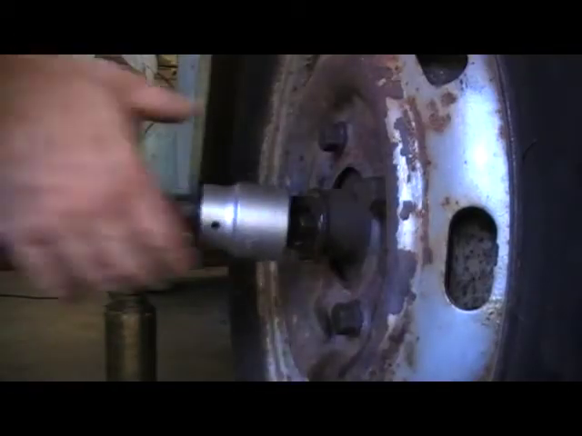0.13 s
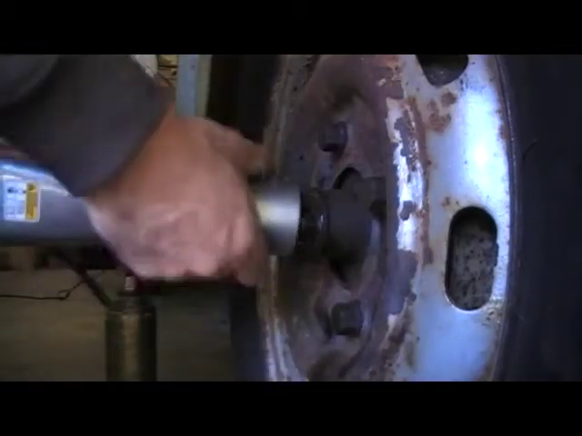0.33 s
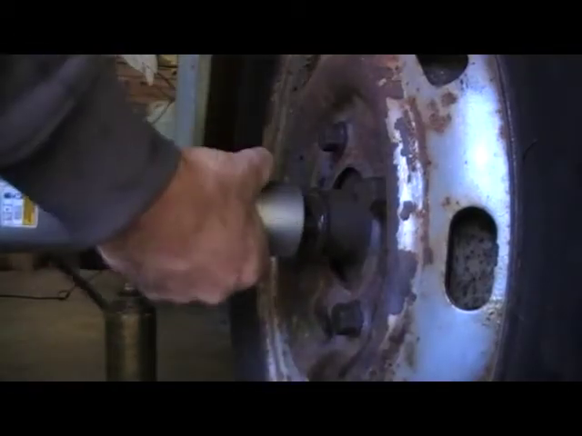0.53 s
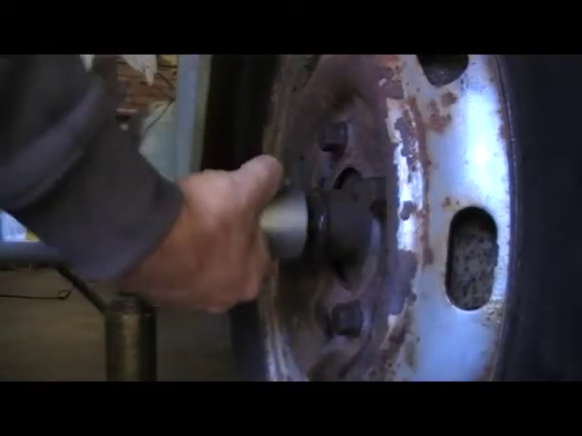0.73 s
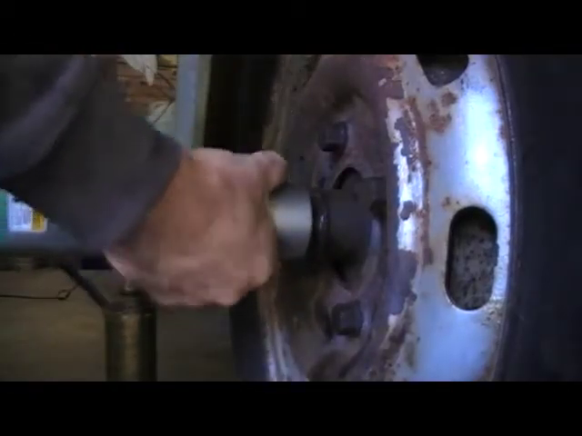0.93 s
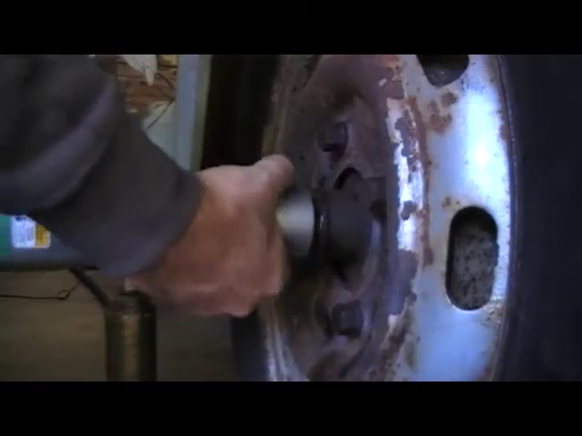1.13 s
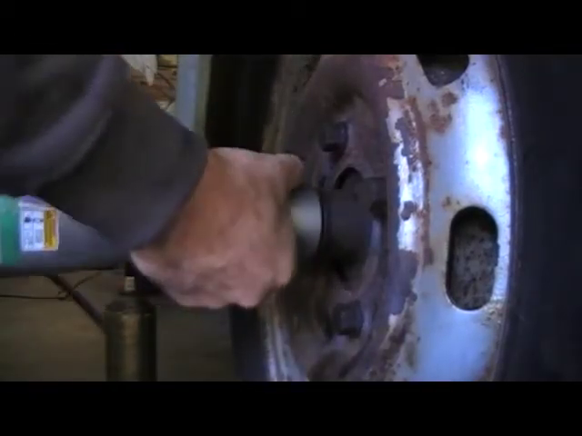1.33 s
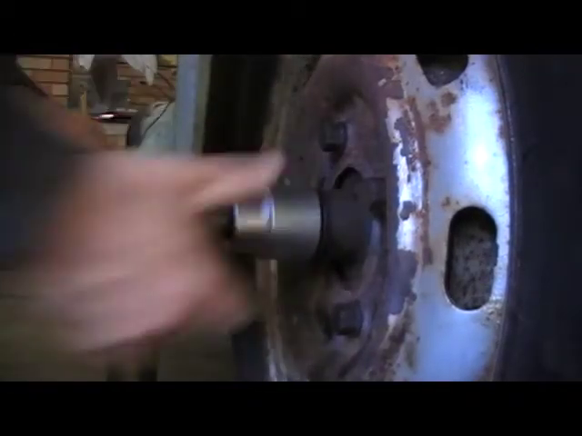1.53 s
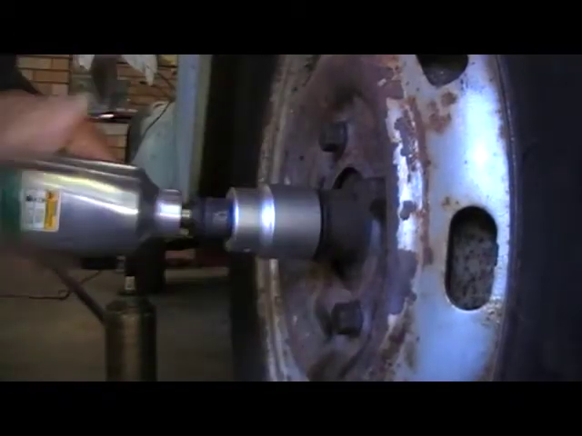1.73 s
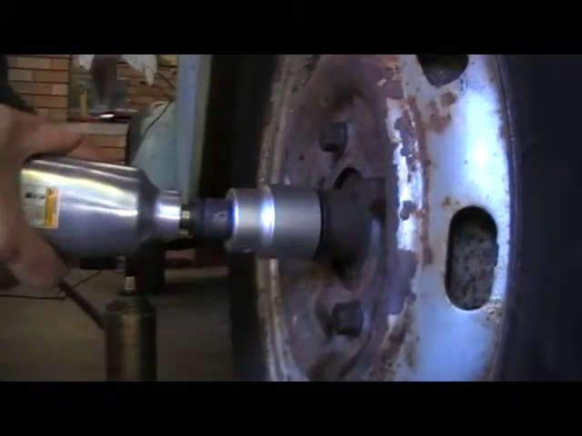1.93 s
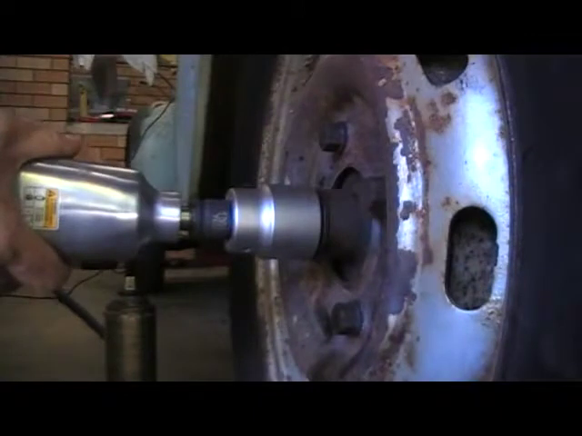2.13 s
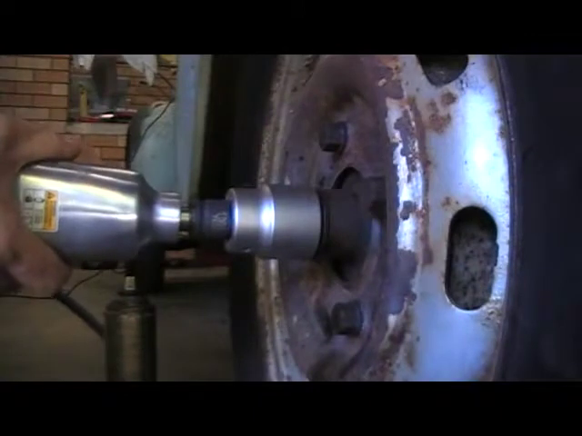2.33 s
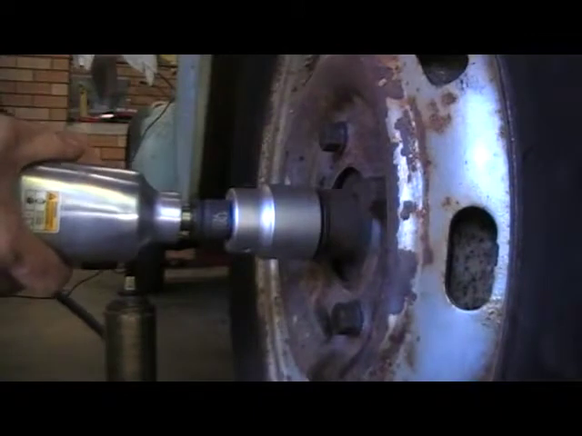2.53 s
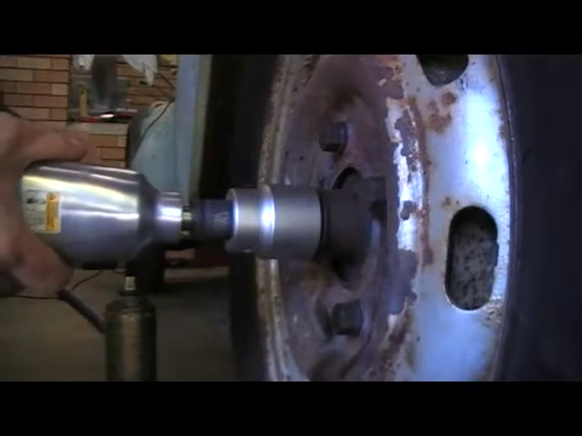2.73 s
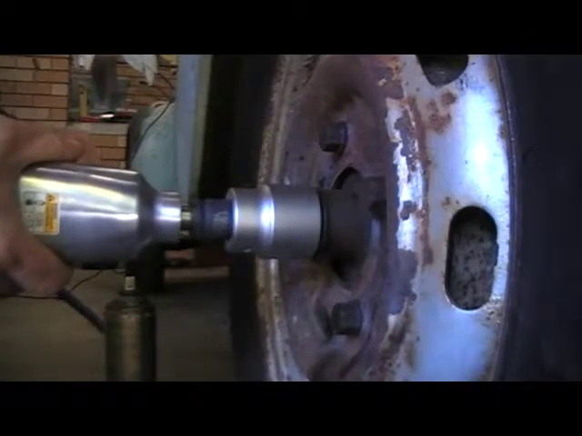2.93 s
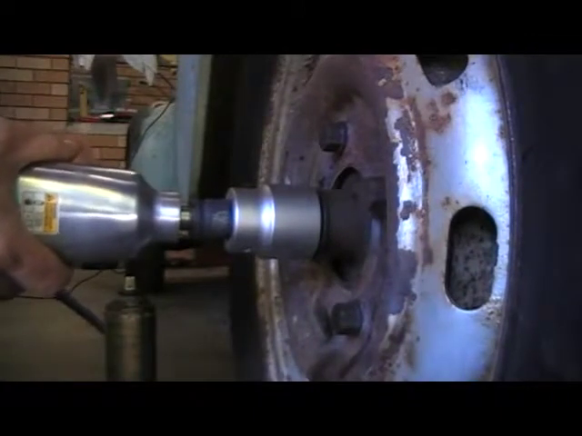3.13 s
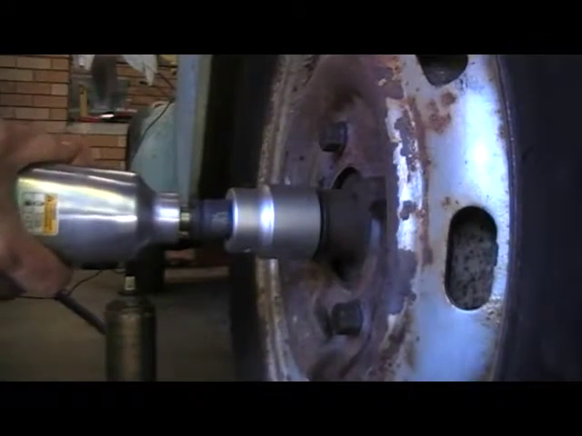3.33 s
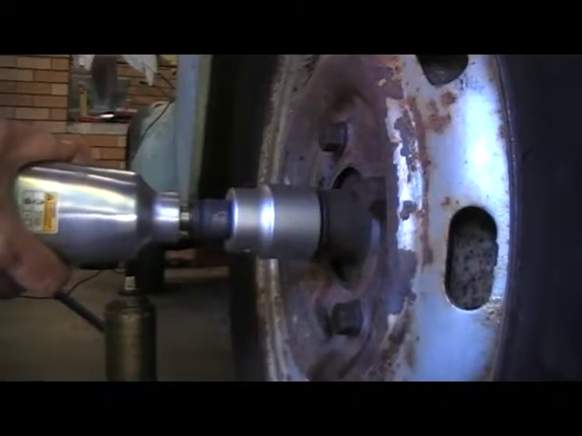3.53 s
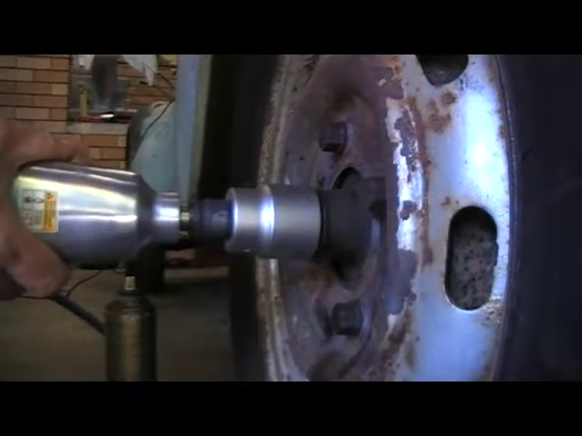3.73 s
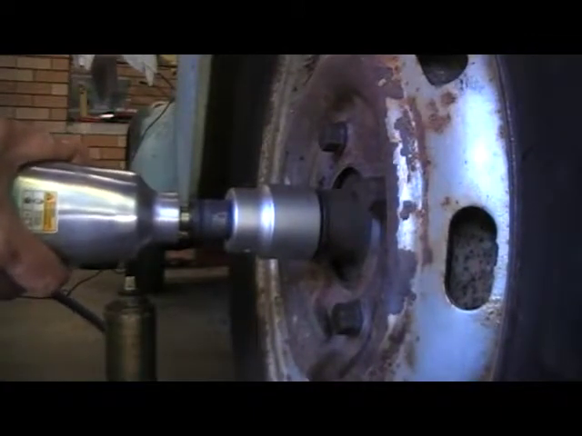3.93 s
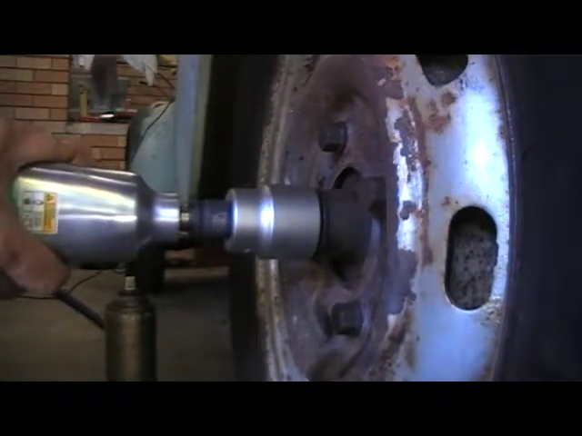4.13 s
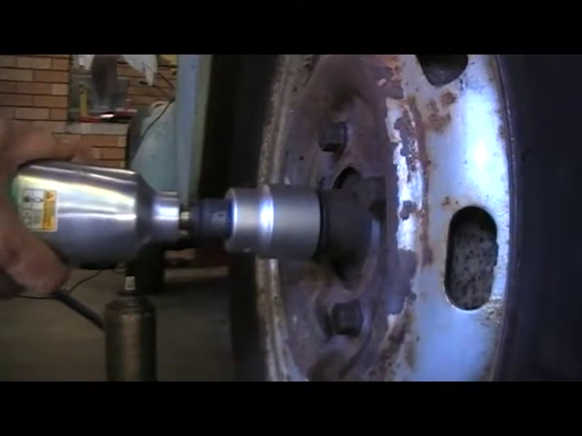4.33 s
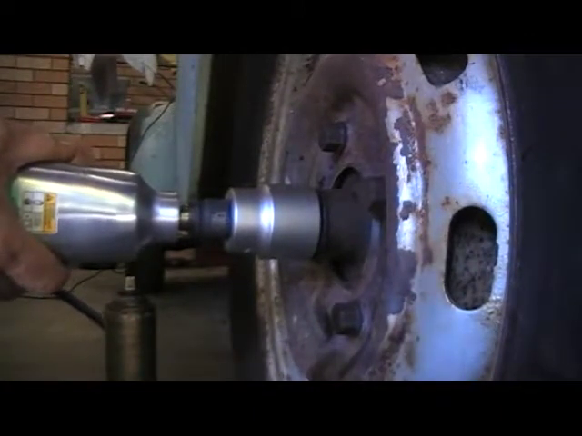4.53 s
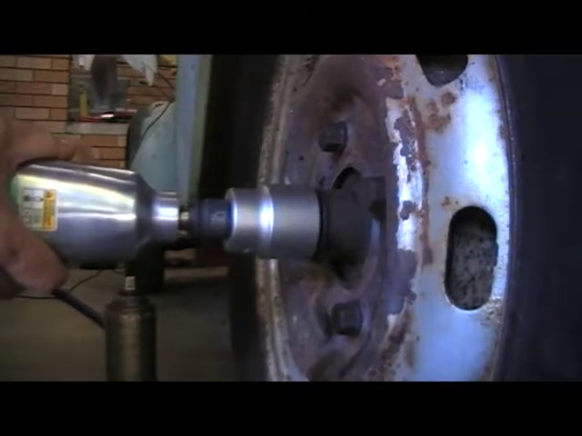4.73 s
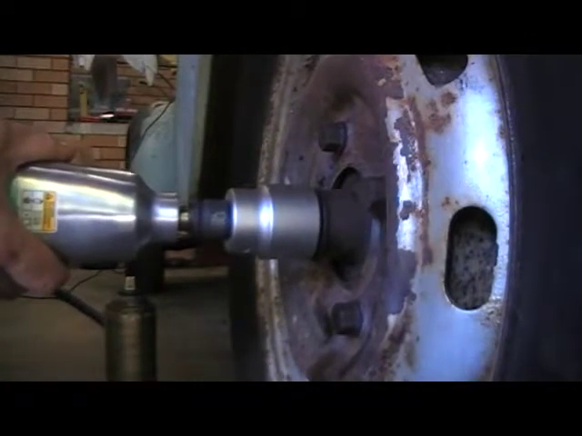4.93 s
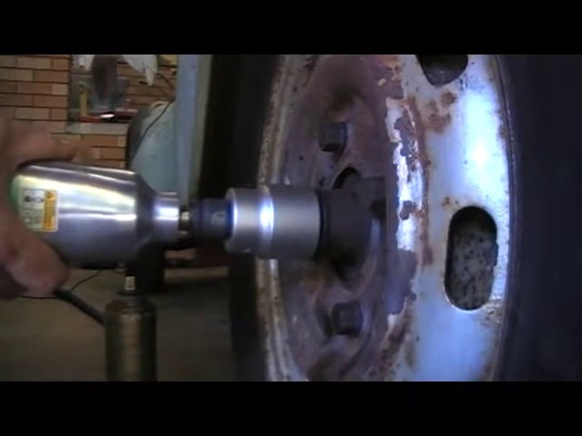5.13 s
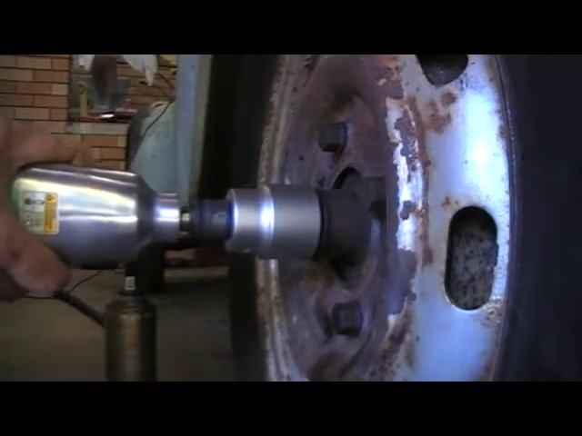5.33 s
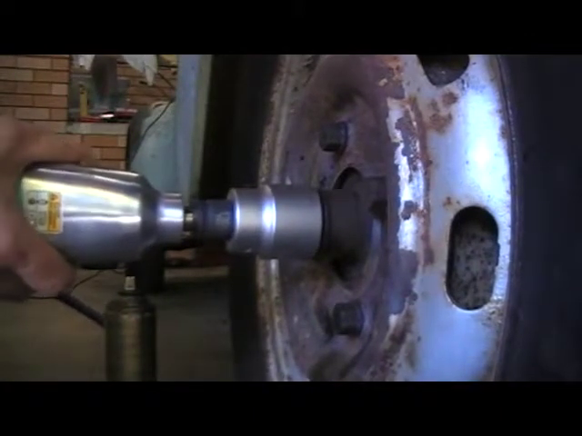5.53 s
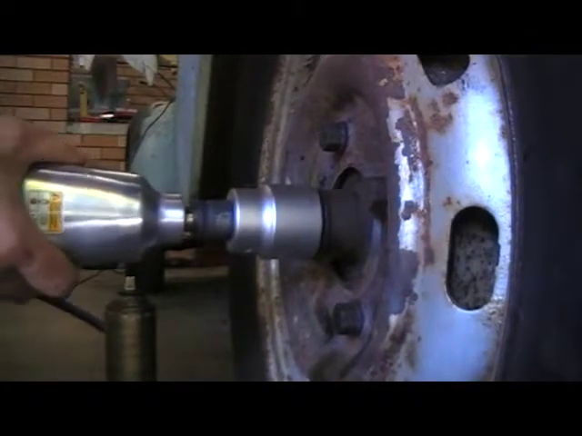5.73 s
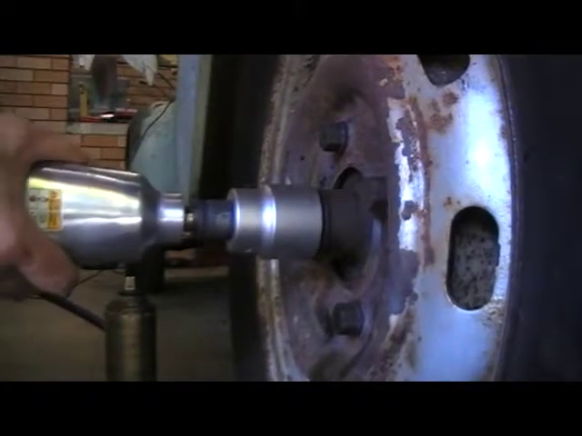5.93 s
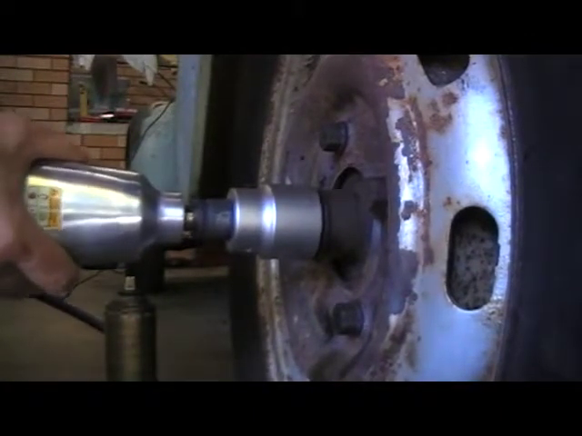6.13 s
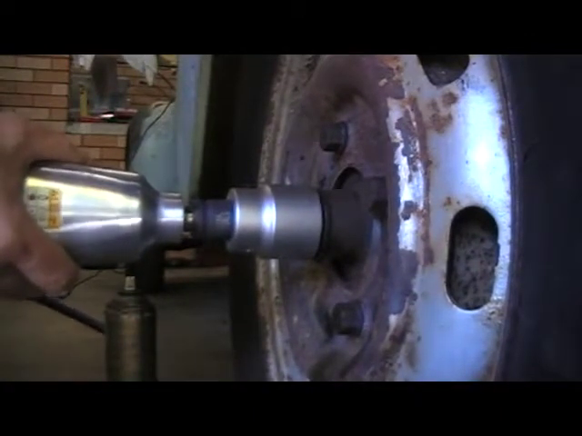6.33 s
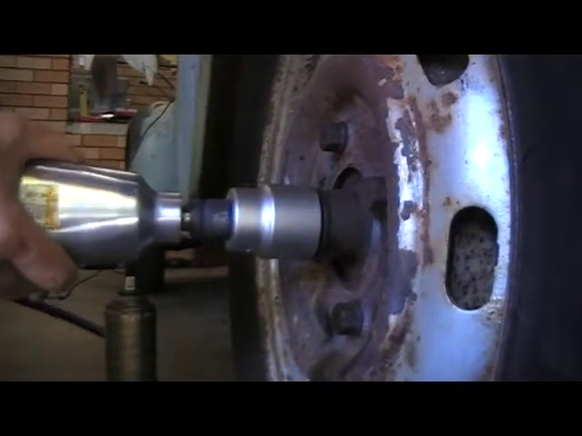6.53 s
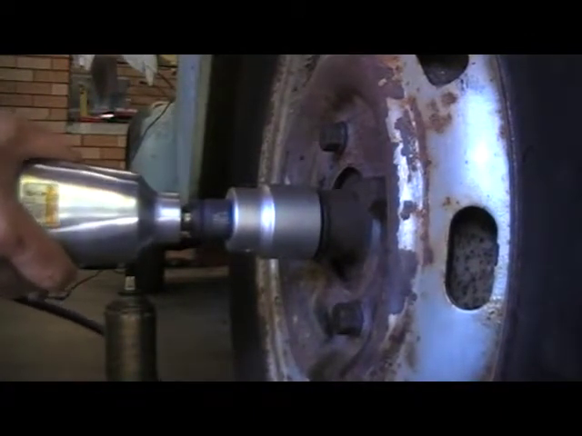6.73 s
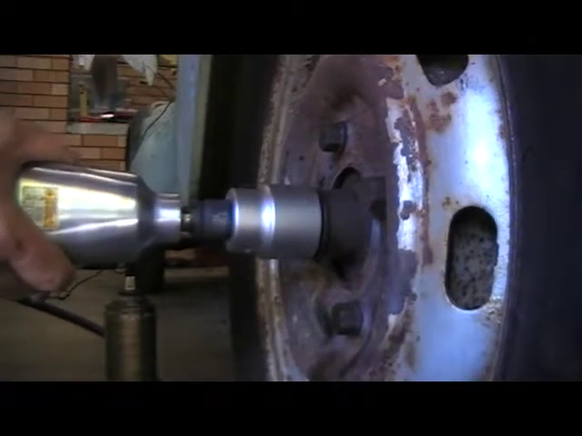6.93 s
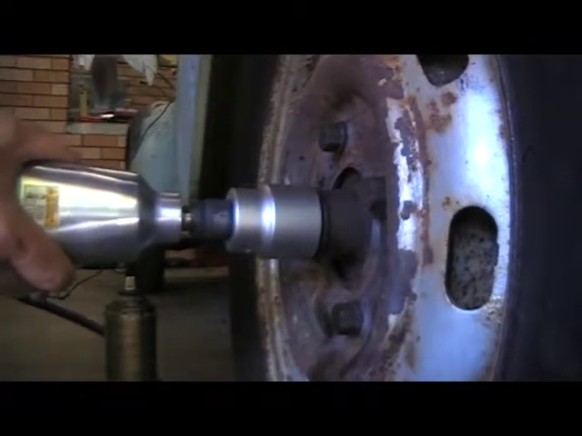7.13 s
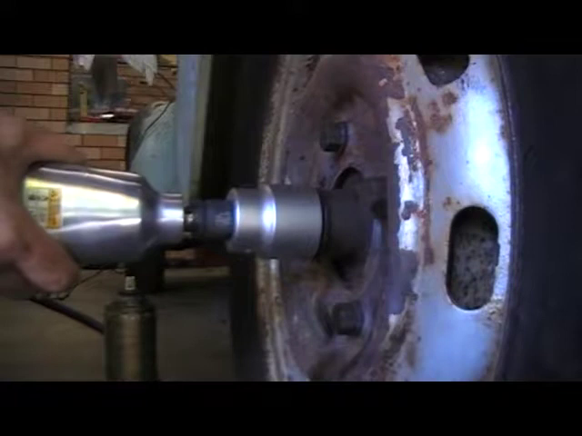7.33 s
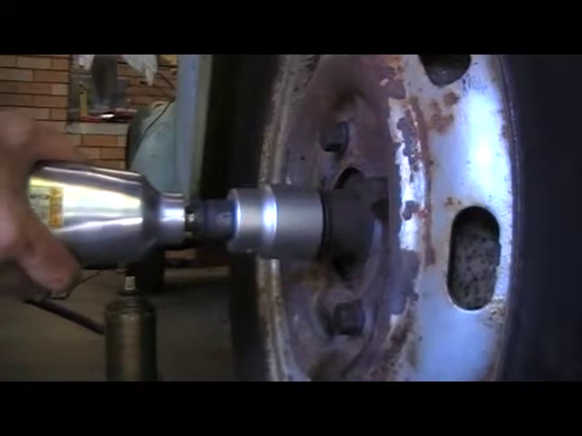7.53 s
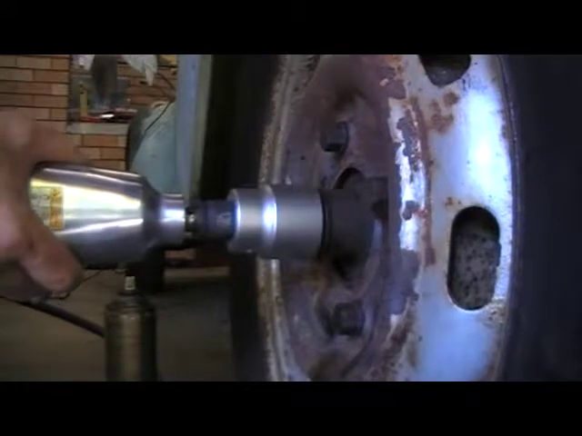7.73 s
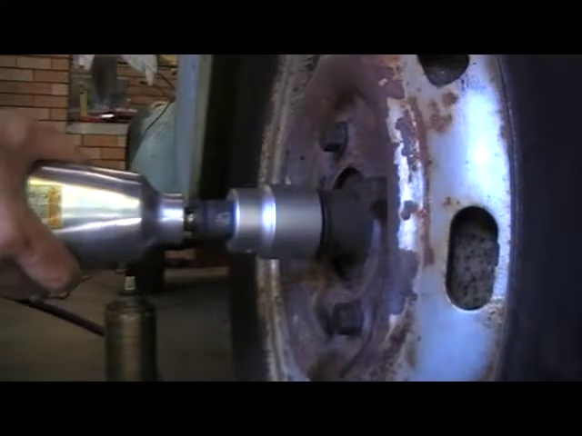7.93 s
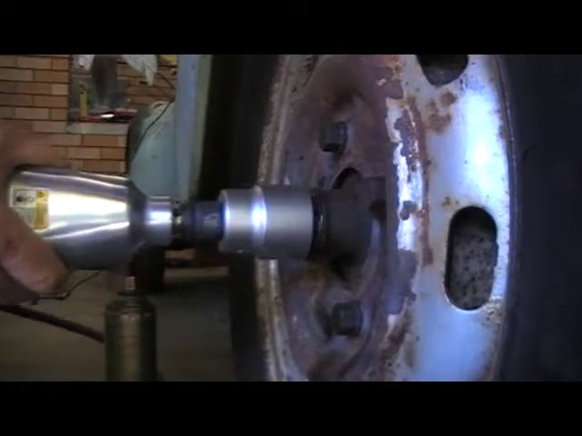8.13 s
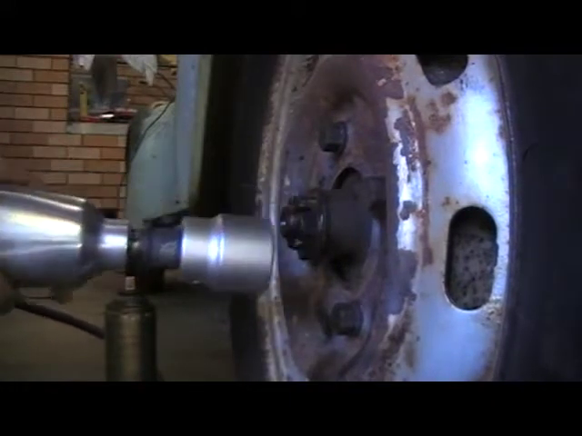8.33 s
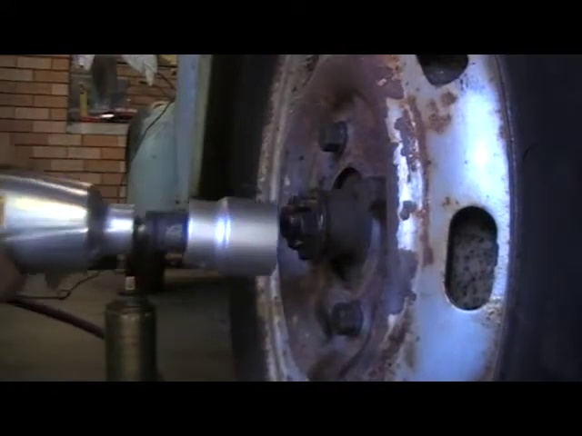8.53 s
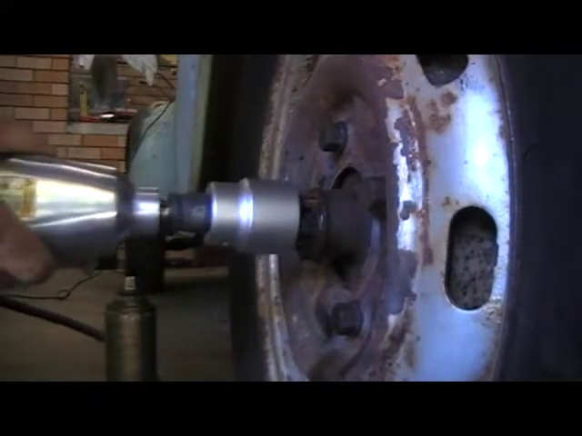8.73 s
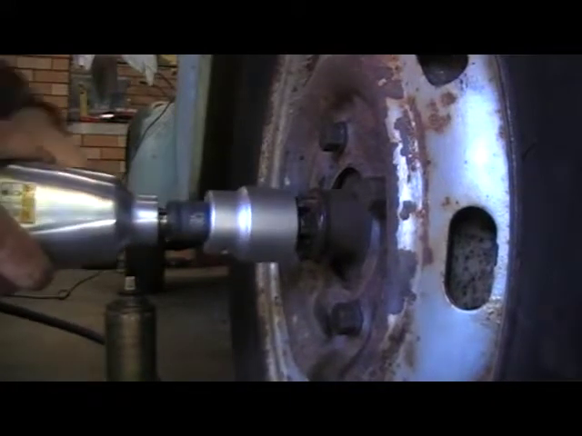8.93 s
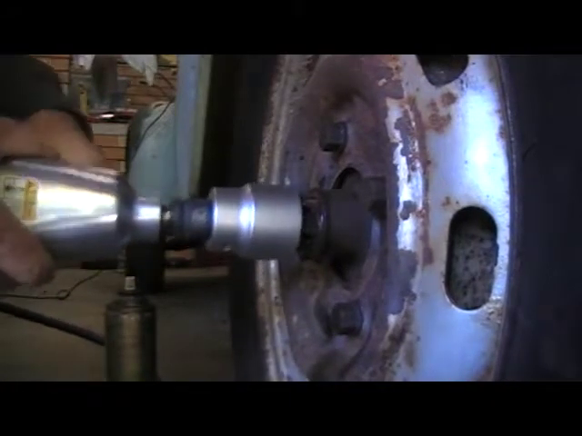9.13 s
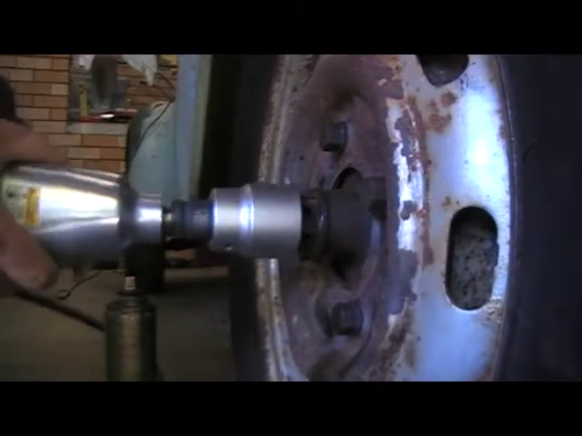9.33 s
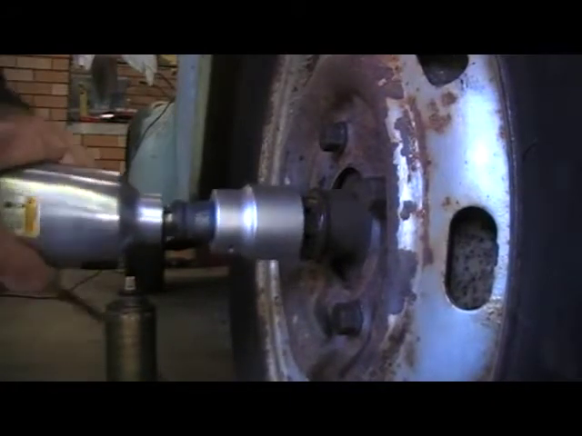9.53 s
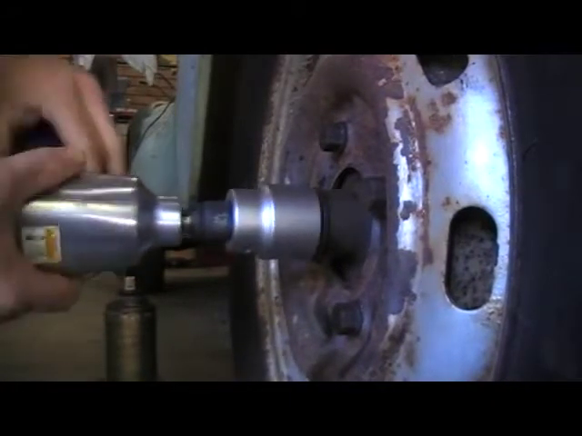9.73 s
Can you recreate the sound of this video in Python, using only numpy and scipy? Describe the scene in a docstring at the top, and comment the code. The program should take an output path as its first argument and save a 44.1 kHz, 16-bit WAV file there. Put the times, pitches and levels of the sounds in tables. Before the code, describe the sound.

Close up, a few metallic clicks and dull knocks sound as a socket is fitted on a steel wheel's nut, with some handling rumble. Then an air impact wrench lets out one long, loud burst of rapid clanking and hissing air that jolts the microphone. When it cuts off, a compressor's steady hum and clatter swells in the slightly echoing garage, and the socket taps the nut twice.

```python
"""Impact wrench on a wheel nut

A socket knocks onto the rusted nut of a steel wheel in a garage, then an air wrench hammers for five seconds.
Each blow rings wheel and socket and stalls the vane motor, which puffs exhaust as it runs up again.
A compressor cuts in meanwhile and drones on at the end, swelling as the gain control lets go."""
import sys
import numpy as np
from scipy import signal
from scipy.fft import rfft, irfft, next_fast_len
from scipy.io import wavfile
from scipy.ndimage import uniform_filter1d

SR = 44100
rng = np.random.default_rng(int(sys.argv[2]) if len(sys.argv) > 2 else 0)


def output_pcm(signal):
    """Save a mono or channel-first signal as 16-bit PCM at the path in sys.argv[1].

    Samples are clipped to [-1, 1] before scaling.
    """
    pcm = np.clip(np.atleast_2d(signal).T, -1, 1) * 32767
    wavfile.write(sys.argv[1], SR, np.round(pcm).astype(np.int16))


N = 431298
TIME_S = np.arange(N) / SR

# Hammer on anvil, once a turn. Each entry: time in seconds.
BLOW_TIMES_S = [2.504, 2.561, 2.6507, 2.7405, 2.8354, 2.923, 3.0183, 3.1143, 3.2063, 3.308, 3.4055, 3.4978,
                3.5944, 3.6902, 3.7882, 3.8872, 3.9885, 4.0915, 4.1989, 4.305, 4.4122, 4.5206, 4.6324,
                4.7417, 4.8456, 4.9526, 5.0585, 5.1616, 5.2701, 5.3791, 5.478, 5.5549, 5.6512, 5.7496,
                5.8483, 5.9464, 6.044, 6.1456, 6.243, 6.3415, 6.445, 6.5193, 6.6244, 6.6992, 6.8065, 6.882,
                6.989, 7.0886, 7.1653, 7.2775, 7.3568, 7.468, 7.5645, 7.657, 7.7551, 7.8484, 7.958]
# Grip of socket on nut. Each row: time in seconds, blow level in dB, slap delay in seconds, slap level in dB.
GRIP = [(2.5, -5, 0.03, -11.5), (3.0, -9, 0.026, -15), (3.6, -9, 0.031, -14.5), (4.5, -12, 0.04, -12.5),
        (5.28, -11.5, 0.039, -10), (5.37, -8, 0.03, -18), (6.55, -8, 0.03, -19.5), (6.75, -8, 0.033, -13.5),
        (7.96, -11, .024, -25.5)]


def contacts():
    """The socket slaps back after each blow but the last. Returns times and levels, blows first."""
    blows = np.array(BLOW_TIMES_S)
    blow_db, delay_s, slap_db = (curve[(blows * SR).astype(int)] for curve in envelopes(GRIP))
    scatter = rng.standard_normal((len(blows), 3))
    slaps = blows + delay_s + 0.0015 * scatter[:, 0]
    blow_db += 0.6 * scatter[:, 1]
    slap_db += 2.5 * scatter[:, 2]
    return np.r_[blows, slaps[:-1]], np.r_[blow_db, slap_db[:-1]]


# Steel modes. Each row: frequency in Hz, gain in dB, t60 in seconds before added damping.
WHEEL_MODES = [(261, -8, 0.14), (565, -6, 0.095), (738.5, -6.5, 0.098), (1159, -0.5, 0.061),
               (1367, 1.5, 0.075), (1536, -1, 0.082), (1778, -0.5, 0.053), (2920, -6, 0.13),
               (3240, -8, 0.17), (3450, -7.5, 0.054), (3620, -3, 0.092), (4400, -8, 0.11),
               (5050, -10, 0.076)]
SOCKET_MODES = [(5480, -8.5, 0.035), (6385, 3, 0.025), (7360, -4, 0.04), (8060, 1.5, 0.028),
                (8520, -0.5, 0.015), (8820, 1.5, 0.019)]


def hammering(times, db):
    """Blows ring wheel and socket; the light slaps miss the wheel's low modes and favour its clank."""
    blows, slaps = slice(len(BLOW_TIMES_S)), slice(len(BLOW_TIMES_S), None)
    low = [mode for mode in WHEEL_MODES if mode[0] < 1300]
    clank = [mode for mode in WHEEL_MODES if 3000 < mode[0] < 4000]
    wheel = strike(times[blows], db[blows] - 2, low, chatter_s=0.012, spread_db=1, damping=1.34, touches=7)
    wheel += strike(times, db - 3, WHEEL_MODES[len(low):],
                    chatter_s=0.011, spread_db=1, damping=1.32, touches=7)
    wheel += strike(times[slaps], db[slaps] + 3.5, clank, chatter_s=0.008, spread_db=4, touches=4)
    socket = strike(times, db - 5, SOCKET_MODES, chatter_s=0.012, spread_db=5, touches=10)
    return wheel + socket + crack(times, db + 13.5, decay_s=0.0081, band_hz=(630, 4700))


TRIGGER_ON_S, TRIGGER_OFF_S = 2.498, 7.966
# Vane pockets emptying. Each entry: lead before a blow in seconds.
PUFF_LEADS_S = [.021, .045, .070, .097]


def vane_puffs(blows, restart_s=0.0273):
    """Envelope of the air pockets that the vanes release, with a gap while the rotor is stalled."""
    run_up = blows[1:, None] - np.array(PUFF_LEADS_S)
    turning = run_up > blows[:-1, None] + restart_s + 0.012
    times = np.c_[blows[1:], blows[:-1] + restart_s, run_up]
    times += 0.0023 * rng.standard_normal(times.shape)
    gains = amp(1.6 * rng.standard_normal(times.shape)) * np.c_[np.ones((len(run_up), 2)), turning]
    pockets = impulses(times, gains)
    return decay(pockets, 0.0097) - decay(pockets, 0.0021)


def muffler_chugs(blows, from_hz=200.5, to_hz=395, length_s=0.0386):
    """The rotor's last rush before a blow swoops up in the muffler, earlier as pressure sags."""
    progress = np.linspace(0, 1, int(length_s * SR))
    cycles = length_s * (from_hz * progress + (to_hz - from_hz) * progress ** 2 / 2)
    swoop = np.sin(np.pi * progress ** 1.62) * np.sin(2 * np.pi * cycles)
    lead_s = 0.033 + 0.001954 * (blows - TRIGGER_ON_S)
    rushes = impulses(blows - lead_s, amp(0.94 * rng.standard_normal(len(blows))))
    return signal.fftconvolve(rushes, swoop)[:N]


# Exhaust hiss and low throb. Each row: frequency in Hz, relative density in dB.
JET_SPECTRUM = [(240, -43), (400, -11), (653, -7), (738, -12), (901, -9.5), (1340, -4), (2470, -5.5),
                (3160, -1.5), (4040, -8), (7570, -1), (15500, -28.5)]
THROB_SPECTRUM = [(15, -54), (25, -25.5), (145, -2.5), (213, -3.5), (264, 0), (500, -14), (1100, -110)]
# Exhaust stereo image. Each row: frequency in Hz, left-right correlation.
EXHAUST_CORRELATION = [(60, 0.64), (240, 0.9), (950, 0.77), (3770, 0.93), (15000, 0.33)]


def exhaust(opening_s=0.0054, shut_db_per_s=404, bleed_db_per_s=65):
    """The jet puffs at each vane and the throb dips at each stall; all sags with the line pressure."""
    blows = np.array(BLOW_TIMES_S)
    held_s = np.clip(TIME_S, TRIGGER_ON_S, TRIGGER_OFF_S) - TRIGGER_ON_S
    released_s = np.maximum(TIME_S - TRIGGER_OFF_S, 0)
    opening = np.minimum(held_s / opening_s, 1) ** 2
    closing = amp(-shut_db_per_s * released_s) + amp(-21 - bleed_db_per_s * released_s)
    puff_depth = np.interp(held_s, [0, held_s[-1]], [0.54, 0.71]) * (released_s == 0)
    puffing = 1 - puff_depth + 2.87 * puff_depth * vane_puffs(blows)
    jet = amp(-1.5 - 2 * held_s) * puffing * noise(JET_SPECTRUM, EXHAUST_CORRELATION)
    stall = uniform_filter1d(decay(impulses(blows + 0.0049, 0.79), 0.049), 130)
    surge_db = 20 * np.exp(-held_s / 0.018)   # the first rush of air thumps
    throb = amp(-19 - 0.2 * held_s + surge_db) * noise(THROB_SPECTRUM, EXHAUST_CORRELATION)
    throb *= 1.2 - 0.89 * stall
    chugs = amp(-10 - 1.6 * held_s) * muffler_chugs(blows[1:])
    return opening * closing * (jet + throb + chugs)


# Blows that pop the microphone. Each entry: time in seconds.
POP_TIMES_S = [3.02, 3.212, 3.9887, 4.633, 4.954, 5.946, 6.0442, 6.1462]


def jolts(times, db, pop_db=7, pop_s=0.00125, recovery_s=0.003):
    """Each shock rattles the microphone and some pop it, left and right in opposite polarity."""
    starts = np.array(POP_TIMES_S)
    pulses = np.cumsum(impulses(starts + pop_s, amp(pop_db)) - impulses(starts, amp(pop_db)))
    pops = pulses - decay(pulses, recovery_s) / (recovery_s * SR)
    rattle = crack(times + 0.0012, db + 18.5, decay_s=0.0026, band_hz=(186, 1700))
    return (rattle + uniform_filter1d(pops, 9)) * [[1], [-1]]


# Socket touching nut and wheel. Each row: start in seconds, then wheel, socket and thud levels in relative dB.
KNOCKS = [(0.022, -19, -37, -31), (0.17, 3.5, 1, -44), (0.269, -10.5, -25, -47), (0.406, -31, -39, -38),
          (0.511, -31, -53, -37), (0.727, -21, -28, -33), (0.744, -21.5, -36, -47),
          (0.841, -19.5, -32.5, -29), (0.99, -28, -39, -36.5), (1.15, -18, -21.5, -29),
          (1.159, 0, -6, -7.5), (1.301, -15, -17.5, -36), (1.325, -14, -43, -27), (1.744, -18.5, -23, -32),
          (1.757, -17.5, -29, -63), (1.79, -24, -50, -32), (2.213, -31.5, -53, -59), (8.704, -28, -28, -36),
          (9.665, -12, -15, -30)]
# Unseated socket. Each row: frequency in Hz, gain in dB, t60 in seconds before added damping.
LOOSE_MODES = [(8610, 1, 0.045), (8880, -3, 0.038)]


def knocks(seated_s=0.735):
    """Touches ring finger-damped steel and thud through the tyre; the socket jingles until seated."""
    times, wheel_db, socket_db, thud_db = np.transpose(KNOCKS)
    loose = times < seated_s
    wheel = strike(times, wheel_db - 11, WHEEL_MODES, chatter_s=0.004, spread_db=2.5, damping=2.7)
    socket = strike(times[~loose], socket_db[~loose] - 5, SOCKET_MODES,
                    chatter_s=0.0066, spread_db=3, damping=1.85)
    socket += strike(times[loose], socket_db[loose], LOOSE_MODES, chatter_s=0.0068, spread_db=0.5)
    jingle_db = np.minimum(socket_db[loose], -40) - 5.5
    jingle = strike(times[loose] - 0.015, jingle_db, LOOSE_MODES, chatter_s=0.17, spread_db=2, touches=30)
    thud = crack(times, thud_db + 15, decay_s=0.036, band_hz=(105, 1080))
    thud += strike(times, thud_db - 4, WHEEL_MODES[:6], chatter_s=0.0089, spread_db=3, damping=0.68)
    wheel += crack(times, wheel_db + 8.5, decay_s=0.0065, band_hz=(680, 1960))
    socket += crack(times, socket_db + 0.5, decay_s=0.0027, band_hz=(3600, 6600))
    return wheel + socket + jingle + thud


# Prominent compressor harmonics. Each row: multiple of the crank rate, relative level in dB.
CRANK_ORDERS = [(4, 1), (6, -3.5), (7, -11), (8, 0), (10, 2), (11, 0.5), (16, -6.5), (17, -8), (19, -2),
                (20, -6), (22, -5.5), (26, -2), (28, 3.5), (29, -4.5), (36, -5), (37, -11), (89, -8),
                (107, -7), (129, -15)]
# Valve clatter and pump hiss. Each row: frequency in Hz, relative density in dB.
VALVE_SPECTRUM = [(1350, -25), (1680, -1), (1900, -3), (2670, -11.5), (4010, -3), (4940, 0), (5440, -25),
                  (7570, -9.5), (13000, -42)]
PUMP_HISS_SPECTRUM = [(35, -59), (60, -36), (179, -11), (231, -17), (1290, -5.5), (2530, -19),
                      (4970, -11.5), (15500, -43)]


def compressor(start_s=3.5, crank_hz=45.89, swell_db_per_s=10):
    """Crank harmonics and valve clatter repeat each turn; the hiss throbs twice a turn."""
    crank_rad = 2 * np.pi * crank_hz * TIME_S
    turn_rad = np.linspace(0, 2 * np.pi, 4096)
    low_orders = {k: -13.5 + 3.4 * rng.standard_normal() for k in range(5, 30)} | dict(CRANK_ORDERS)
    drone = sum(amp(db) * np.cos(k * turn_rad + 1.21 * rng.standard_normal())
                for k, db in low_orders.items())
    high_orders = np.arange(30, 270)
    gains = amp(at_hz(VALVE_SPECTRUM, high_orders * crank_hz) + 3.6 * rng.standard_normal(len(high_orders)))
    phases = rng.uniform(0, 2 * np.pi, (len(high_orders), 1))
    clatter = gains @ np.cos(high_orders[:, None] * turn_rad + phases)
    one_turn = amp(-27) * unit_rms(drone) + amp(-37) * unit_rms(clatter)
    hiss = amp(-34) * noise(PUMP_HISS_SPECTRUM, correlation=[(100, 1), (3000, 0.85), (15000, 0.11)])
    hiss *= 1 + 0.31 * np.cos(2 * crank_rad)
    swell_db = -31 + swell_db_per_s * (TIME_S - N / SR)   # one band of hiss grows toward the end
    hiss += amp(swell_db) * bandpass(rng.standard_normal((2, N)), (3300, 4500))
    fade_in = np.clip(TIME_S - start_s, 0, 1)
    return fade_in * (np.interp(crank_rad % (2 * np.pi), turn_rad, one_turn) + hiss)


# Hand movement. Each row: time in seconds, rumble level in dB, rustle level in dB.
HANDLING = [(0, -46, -36), (.07, -58, -27.5), (.15, -48, -46), (.7, -41, -58), (1.1, -39, -52),
            (1.38, -29.5, -43), (1.46, -31, -34), (1.62, -40, -46.5), (1.77, -33, -38.5),
            (1.93, -38.5, -54), (2.45, -62, -59)]
# Handling noise. Each row: frequency in Hz, relative density in dB.
RUMBLE_SPECTRUM = [(18, -49), (30, -23), (107, -1.5), (397, -19), (1750, -19.5), (3000, -36), (6600, -120)]
RUSTLE_SPECTRUM = [(880, -33), (1600, -7), (4400, -13), (7910, -5), (15500, -37)]


def handling():
    """Hands, sleeve and hose rumble and rustle until the wrench is in place."""
    rumble_db, rustle_db = envelopes(HANDLING)
    correlation = [(100, 0.78), (2000, 0.93), (12000, 0.28)]
    rumble = amp(rumble_db) * noise(RUMBLE_SPECTRUM, correlation)
    rustle = amp(rustle_db) * noise(RUSTLE_SPECTRUM, correlation)
    return (TIME_S < HANDLING[-1][0]) * (rumble + rustle)


def garage_air():
    """A steady, low wash of room noise."""
    hz_db = [(18, -56), (30, -29), (144, -7), (237, -15), (360, -9.5), (4090, -26.5), (15500, -42)]
    return amp(-42) * noise(hz_db, correlation=[(100, 0.59), (12000, 0.7)])


def garage_reverb(x, bass_t60_s=0.1933, half_t60_hz=12600):
    """Wall echoes: ten feedback delays a side, duller on every round."""
    size = next_fast_len(N + SR)
    hz, spectrum, sides = bin_hz(size), rfft(x, size), []
    loss_db_per_s = 60 / bass_t60_s * (1 + hz / half_t60_hz)
    for delays_s in rng.uniform(0.009, 0.045, (2, 10)):
        loops = [amp(-loss_db_per_s * delay) * np.exp(-2j * np.pi * hz * delay) for delay in delays_s]
        response = sum((-1) ** k * loop / (1 - loop) for k, loop in enumerate(loops))
        sides.append(irfft(spectrum * response, size)[:N])
    return np.array(sides)


def strike(times, level_db, modes, chatter_s, spread_db, damping=1.28, touches=3):
    """A contact chatters: a first touch and weaker ones ring each mode with random strength and sign."""
    lateness = rng.random((len(times), touches)) * (np.arange(touches) > 0)
    touch_s = times[:, None] + chatter_s * lateness
    ringing = np.zeros(N)
    for hz, mode_db, t60_s in modes:
        scatter_db = spread_db * rng.standard_normal((len(times), 1))
        gains = amp(level_db[:, None] + mode_db - 7.7 * lateness + scatter_db)
        clicks = impulses(touch_s, gains * rng.choice([-1, 1], touch_s.shape))
        radius, angle = amp(-60 * damping / (t60_s * SR)), 2 * np.pi * hz / SR
        feedback = [1, -2 * radius * np.cos(angle), radius ** 2]
        ringing += signal.lfilter([0, np.sin(angle)], feedback, clicks + 1e-18)
    return ringing


def crack(times, level_db, decay_s, band_hz):
    """The countless short modes of a contact: a noise burst that dies fast."""
    return bandpass(decay(impulses(times, amp(level_db)), decay_s) * rng.standard_normal(N), band_hz)


def noise(spectrum, correlation):
    """Stereo noise at unit rms from (Hz, dB) and (Hz, left-right correlation) points."""
    hz = bin_hz(N)
    alike = at_hz(correlation, hz)
    mid, side = rfft(rng.standard_normal((2, N))) * amp(at_hz(spectrum, hz))
    return unit_rms(irfft(np.sqrt(1 + alike) * mid + np.sqrt(1 - alike) * side * [[1], [-1]], N))


def bandpass(x, band_hz):
    return signal.sosfilt(signal.butter(2, band_hz, "band", fs=SR, output="sos"), x)


def decay(x, seconds):
    """One-pole filter: a unit impulse dies away from height 1."""
    return signal.lfilter([1], [1, -np.exp(-1 / (seconds * SR))], x + 1e-18)


def impulses(times, gains):
    train = np.zeros(N)
    np.add.at(train, np.clip((times * SR).astype(int), 0, N - 1), gains)
    return train


def envelopes(rows):
    times, *columns = np.transpose(rows)
    return [np.interp(TIME_S, times, column) for column in columns]


def at_hz(points, hz):
    point_hz, values = np.transpose(points)
    return np.interp(np.log(hz), np.log(point_hz), values)


def bin_hz(size):
    return np.maximum(np.arange(size // 2 + 1) * SR / size, 1)


def amp(db):
    return 10 ** (db / 20)


def unit_rms(x):
    return x / np.sqrt(np.mean(x ** 2) + 1e-20)


def scene():
    """Stereo mix; only the struck metal feeds the reverb."""
    times, db = contacts()
    metal = hammering(times, db) + knocks()
    background = handling() + garage_air()
    return metal + amp(-14) * garage_reverb(metal) + exhaust() + compressor() + jolts(times, db) + background


# The left microphone port hears more bass. Each row: frequency in Hz, left minus right in dB.
BALANCE = [(60, 5), (380, 1.5), (15000, 0.5)]


def record(dry, overload=2.9, threshold_db=-25.5, release_db_per_s=9.9, cutoff_hz=15700):
    """The capsule overloads; gain control clamps fast and lets go slowly; peaks clip; the top is cut."""
    rounded = overload * np.tanh(dry / overload)
    level_db = 10 * np.log10(decay(np.mean(rounded ** 2, 0), 0.075) / (0.06 * SR) + 1e-12)
    release_db = release_db_per_s * TIME_S
    held_db = np.maximum.accumulate(level_db + release_db) - release_db
    levelled = rounded * amp(-0.6 * np.maximum(held_db - threshold_db, 0))
    balance = amp(at_hz(BALANCE, bin_hz(N)) / 2 * [[1], [-1]])
    clipped = np.clip(irfft(rfft(levelled) * balance, N), -1, 1)
    return signal.sosfilt(signal.ellip(10, 1, 60, cutoff_hz, fs=SR, output="sos"), clipped)


dry = scene()
out = record(dry)
output_pcm(out)
```